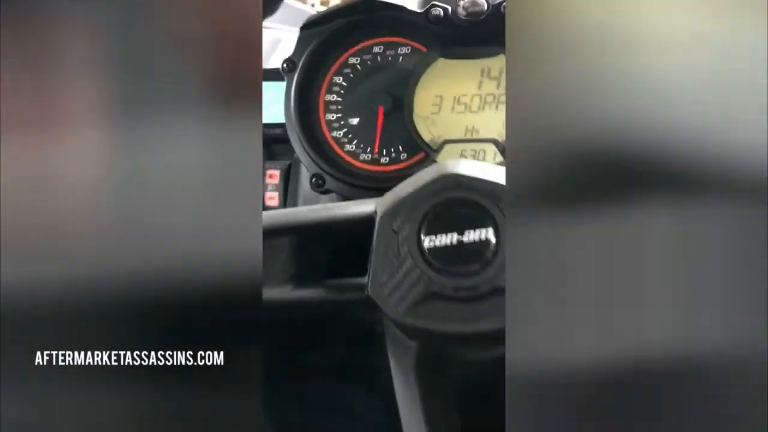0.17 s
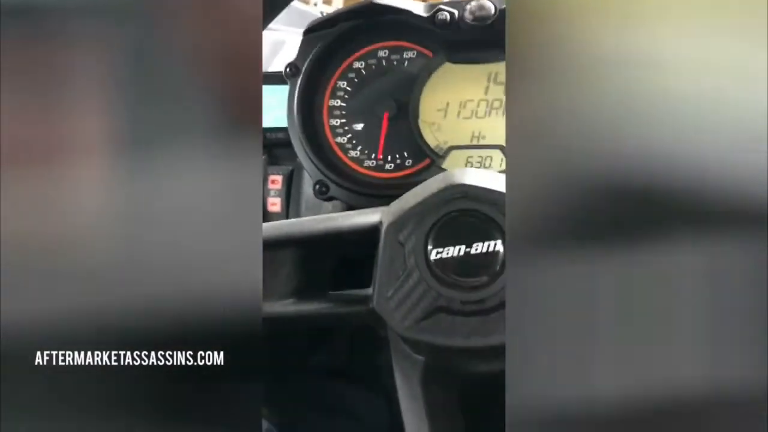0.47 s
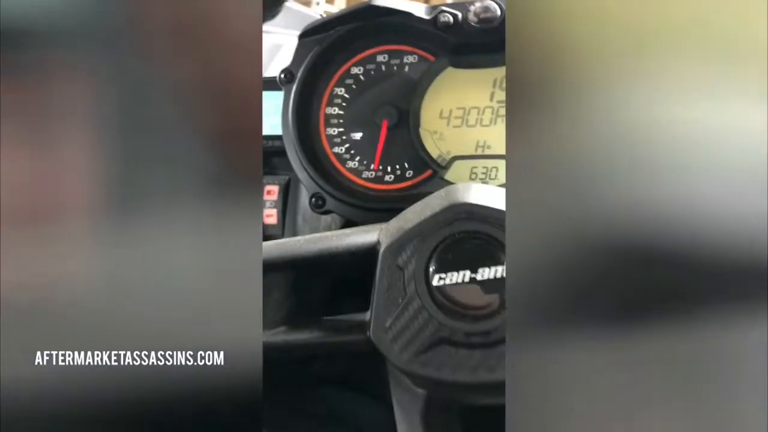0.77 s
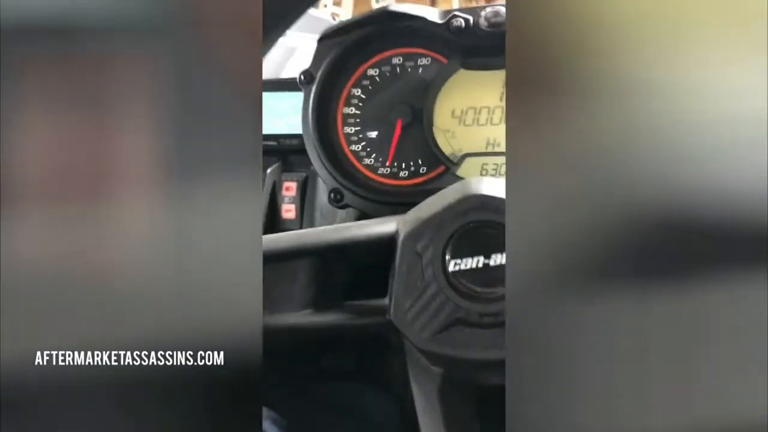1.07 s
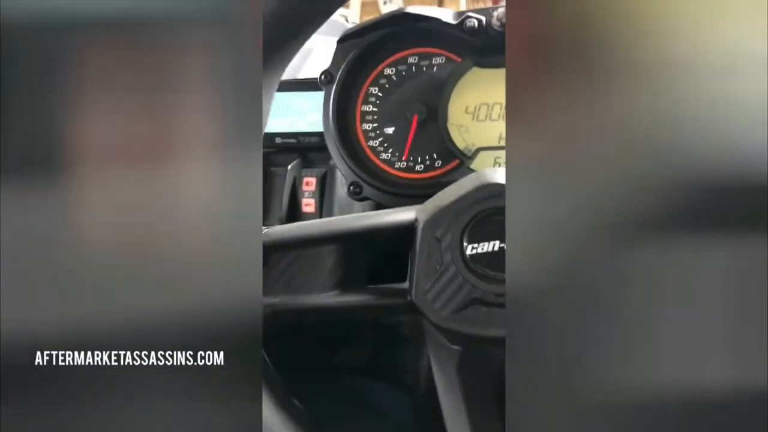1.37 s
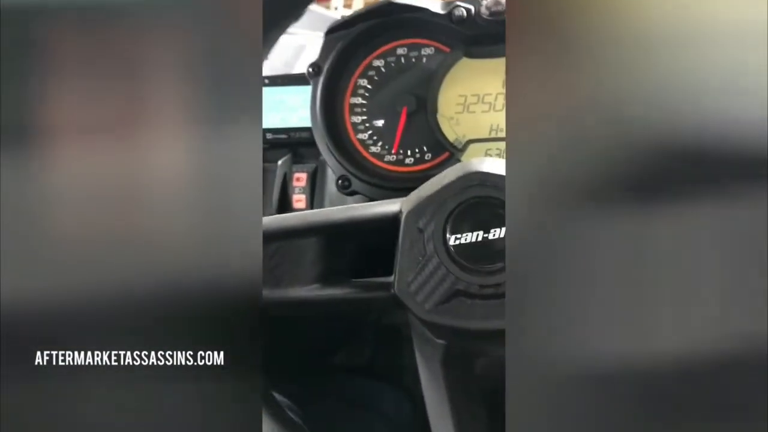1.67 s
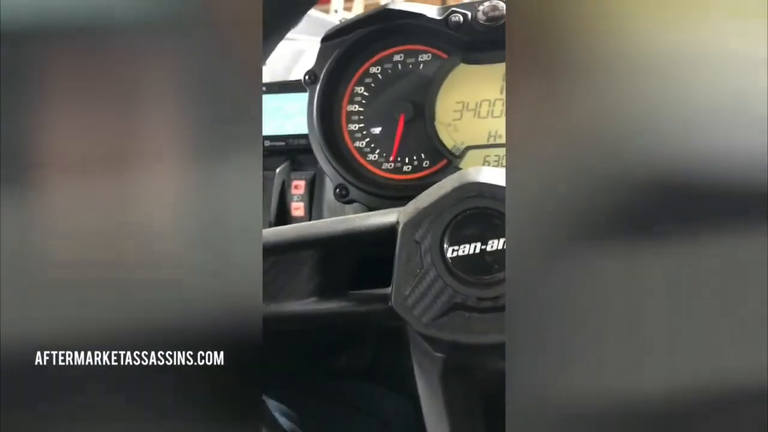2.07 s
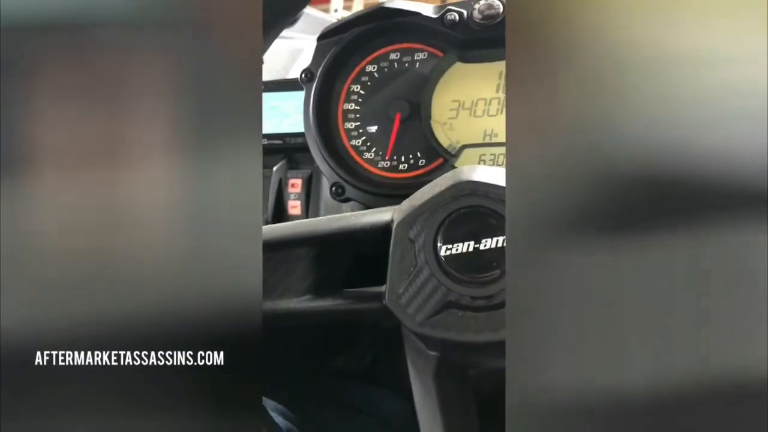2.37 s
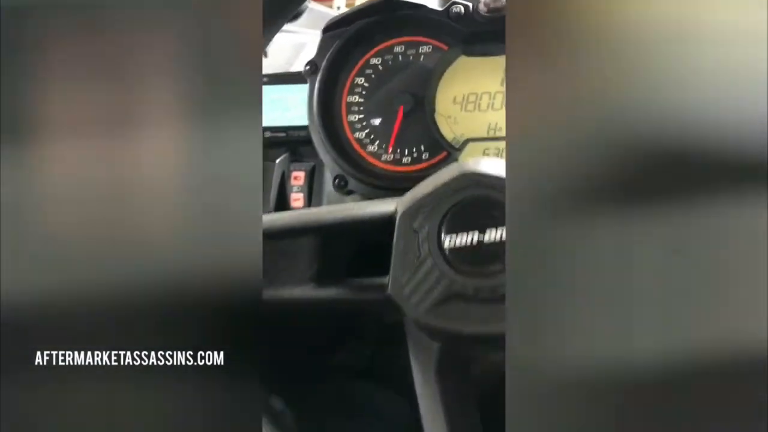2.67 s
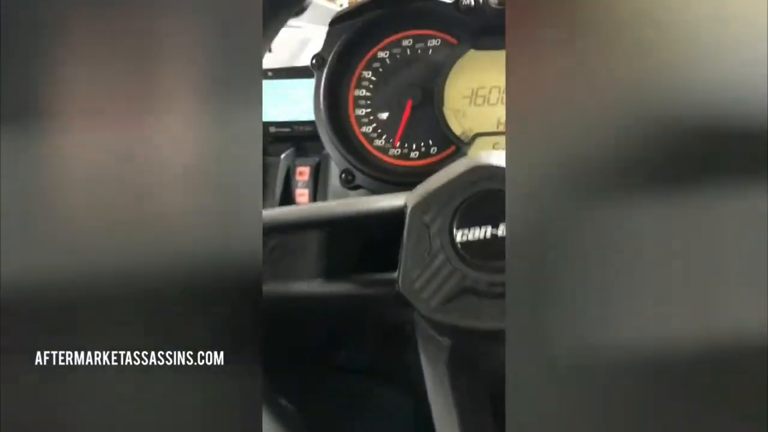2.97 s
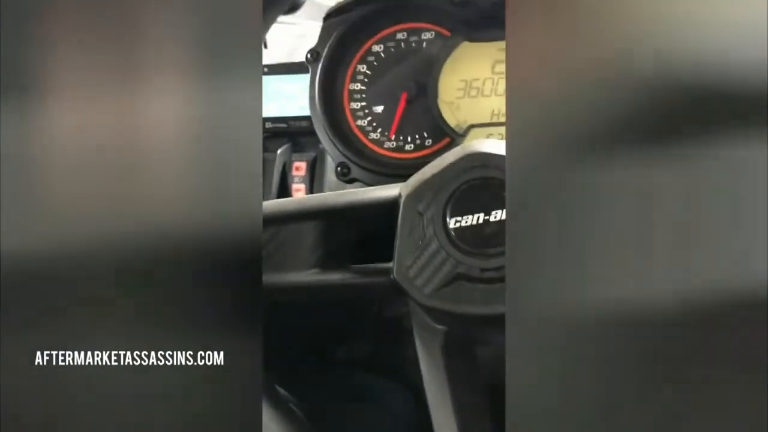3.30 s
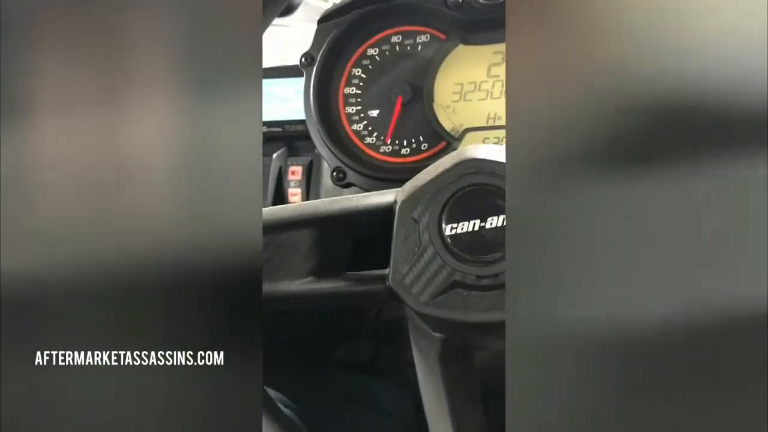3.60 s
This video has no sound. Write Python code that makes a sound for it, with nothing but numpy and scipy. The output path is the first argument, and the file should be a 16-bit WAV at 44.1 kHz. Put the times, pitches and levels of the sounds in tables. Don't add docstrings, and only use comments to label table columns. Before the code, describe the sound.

Three-cylinder engine pulls hard, eases off with a whooshing blow-off hiss, coasts low, then repeats

```python
import sys
import numpy as np
from scipy import signal
from scipy.io import wavfile
from scipy.ndimage import uniform_filter1d

SR = 44100
rng = np.random.default_rng(int(sys.argv[2]) if len(sys.argv) > 2 else 0)


def nominal_scale(level):
    x = np.asarray(level, float) / 20
    return 10 ** x


def unload_audio(sound):
    columns = np.transpose(np.atleast_2d(sound))
    steps = np.round(np.clip(columns, -1, 1) * 32767)
    wavfile.write(sys.argv[1], SR, steps.astype(np.int16))


N = 164934

# (throttle opens [s], lifts [s], stumble ends [s], blow-off level [dB])
REVS = [
    (0., 0.701, .82, -24.5),
    (1.772, 2.495, 2.61, -24.5),
]
THROTTLE_OPEN_S, THROTTLE_SHUT_S = .025, .025


def read(points, hz):
    f, value = np.transpose(points)
    return np.interp(np.log(hz + 1), np.log(f + 1), value)


def evened(x):
    return x / np.sqrt(np.mean(x ** 2) + 1e-20)


def slow(rate_hz):
    span = int(SR / rate_hz)
    return evened(uniform_filter1d(uniform_filter1d(rng.standard_normal(N), span), span))


def gate(t, on, off, rise, fall):
    opening = np.clip((t - on) / rise + .5, 0, 1)
    closing = np.clip((off - t) / fall + .5, 0, 1)
    return opening * closing


def shaped(points, hz):
    gain = nominal_scale(read(points, hz)) * (hz > points[0][0] * .9)
    return gain / np.sqrt((gain ** 2).sum())


def bumps(rows, hz):
    return nominal_scale(sum(db / (1 + (2 * (hz - f) / width) ** 2) for f, width, db in rows))


def noise(field, patchy_db):
    hz = np.fft.rfftfreq(1024, 1 / SR)[:, None]
    t = np.arange(N // 256 + 5) * 256 / SR
    real, imaginary, patches = rng.standard_normal((len(t), 513, 3)).T
    patches = uniform_filter1d(uniform_filter1d(patches, 10, axis=0), 8, axis=1)
    z = (real + 1j * imaginary) * field(hz, t) * nominal_scale(patchy_db * evened(patches))
    return signal.istft(z, nperseg=1024, noverlap=768)[1][:N]


def whistle(hz, width_hz):
    r = np.exp(-np.pi * width_hz / SR)
    a, b = rng.standard_normal((2, N))
    fuzz = signal.lfilter([1], np.convolve([1, -r], [1, -r]), a + 1j * b)
    phase = 2 * np.pi * np.cumsum(hz * np.ones(N)) / SR
    return evened((fuzz * np.exp(1j * phase)).real)


def control(t, column):
    # (time [s], firing rate [Hz], cylinder imbalance [dB], drone swell [dB])
    course = [(0, 76, -22, 0), (.12, 82.7, -31, 0), (.2, 91.4, -22, 0), (.3, 95.5, -28, 0),
              (.51, 113.9, -11, 40), (.69, 124.2, -28, 4.5), (.83, 105.2, -17, 7.5), (1.13, 88.8, -26, 0),
              (1.5, 82.93, -23, -1.5), (1.8, 79, -7, -2), (2.0, 87.34, -27, 0), (2.23, 107.7, -14, 0),
              (2.4, 119.8, -14, 0), (2.49, 124, -18, 5), (2.62, 106.9, -20, 11.5), (2.87, 92.34, -35, 1.5),
              (3.2, 86.25, -16, -0.5), (3.74, 81.3, -20, -1)]
    return np.interp(t, np.array(course)[:, 0], np.array(course)[:, column])


def rumble():
    # (frequency [Hz], density [dB per Hz])
    body = [(20, -27), (40, -25), (70, 25), (120, -13.5), (230, 6), (300, -7.5), (430, -9), (520, -45)]

    def field(hz, t):
        return nominal_scale(read(body, hz) - 40 * (hz > 560)) + 0 * t
    return nominal_scale(-30.5) * evened(noise(field, patchy_db=1.5))


def road_power(hz, t):
    # (frequency [Hz], density [dB per Hz])
    hiss = [(450, -12.5), (600, -2.5), (950, -3.5), (1400, -3), (2500, -7.5), (4400, -8.5), (7500, -20.5),
            (15700, -32)]
    level_db = -29 - 4.5 * np.exp(-t / 0.61)
    return (nominal_scale(level_db) * shaped(hiss, hz)) ** 2


def intake_power(hz, t, on, lift):
    # (frequency [Hz], density [dB per Hz])
    roar = [(450, 0), (700, 1), (1400, -3), (2300, -3.5), (3200, -8.5), (5000, -12.5), (9000, -17),
            (15700, -26)]
    # (frequency [Hz], width [Hz], gain [dB])
    pipes = [(2053, 105, 3), (2470, 360, -1), (2640, 410, 5), (1300, 640, 1)]
    rise_s, fade_s, db_per_hz = 0.15, 0.092, 0.2
    pull = np.clip((t - on) / rise_s, 0, 1) * np.exp(-np.clip(t - lift, 0, 9) / fade_s)
    level_db = -25.5 + db_per_hz * (control(t, column=1) - 118.5)
    return (pull * nominal_scale(level_db) * shaped(roar, hz) * bumps(pipes, hz)) ** 2


def gush_power(hz, t, lift, gush_db):
    # (frequency [Hz], density [dB per Hz])
    jet = [(450, -28), (1000, 0), (2000, -4.5), (3500, -7), (4600, -6.5), (7000, -9.5), (11000, -9.5),
           (15700, -22)]
    # (frequency [Hz], width [Hz], gain [dB])
    pipes = [(3150, 400, 2), (3900, 500, 3), (4620, 200, 5), (7300, 250, 4), (12800, 900, 3),
             (15200, 700, 4)]
    # (frequency [Hz], hold [s])
    hold = [(1000, 0.044), (4000, 0.12), (8000, 0.042), (14000, .02)]
    lead_s, rise_s = .028, .065
    since = t - lift + lead_s
    t60 = read([(1000, 1.86), (12000, 1.47)], hz)
    falling = np.clip(since - rise_s - read(hold, hz), 0, 9)
    swell = np.clip(since / rise_s, 0, 1) * nominal_scale(gush_db - 60 * falling / t60)
    return (swell * shaped(jet, hz) * bumps(pipes, hz)) ** 2


def air():
    # (frequency [Hz], width [Hz], gain [dB])
    cabin = [(617, 46, 4.7), (694, 10, 2.3), (916, 42, 5.2), (1178.4, 17.4, 10.7), (1285, 17, 5.6),
             (1510, 34, 2.1), (2041, 105, 4.6), (2582, 13, 2.3), (2970, 21, 4.7), (3650, 35, 7.2),
             (4690, 66, 8.1), (6600, 160, 3.3), (7130, 200, 3.5)]
    # (frequency [Hz], width [Hz], gain [dB])
    dips = [(1700, 160, -4.5), (4780, 640, -5.5), (7860, 690, -1.5), (10400, 1000, -3.5)]

    def field(hz, t):
        power = road_power(hz, t)
        for on, lift, end, gush_db in REVS:
            power = power + intake_power(hz, t, on, lift) + gush_power(hz, t, lift, gush_db)
        return np.sqrt(power) * bumps(cabin + dips, hz)
    return noise(field, patchy_db=1.28)


def turbo():
    # (frequency [Hz], width [Hz], time after lift [s], length [s], level [dB])
    chirps = [
        (6200, 630, -0.0074, .05, -35.5),
        (4740, 67, 0.078, 0.18, -44),
        (7570, 480, 0.033, 0.1, -49.5),
    ]
    lead_s, start_hz, peak_hz = .36, 9500, 19000
    rise_hz_s, fall_hz_s = 28000, 20000
    t, out = np.arange(N) / SR, np.zeros(N)
    for on, lift, end, gush_db in REVS:
        spool_up = start_hz + rise_hz_s * (t - lift + lead_s)
        spool_down = peak_hz - fall_hz_s * (t - lift)
        hz = np.clip(np.minimum(spool_up, spool_down), 500, 21000)
        whine_db = -50.5 - 5 * (t > lift) + slow(20)
        audible = np.clip((hz - 8000) / 6000, 0, 1)
        out += nominal_scale(whine_db) * audible * whistle(hz, width_hz=1000)
        pull = np.clip((t - on) / (lift - on), 0, 1) * gate(t, on, lift + .04, THROTTLE_OPEN_S, .06)
        out += nominal_scale(-38) * pull * whistle(2045, width_hz=100)
        for f, width, after, length, level_db in chirps:
            puff = np.exp(-(2 * (t - lift - after) / length) ** 2)
            out += nominal_scale(level_db) * puff * whistle(f, width)
    return out


def loaded_pipe_db(f):
    # (frequency [Hz], level [dB])
    response = [(45, -33), (84, -29), (91, -16.5), (101, -18.5), (108, -21.5), (114, -10.5), (121, -27.5),
                (126, -6.5),
                (150, -26), (167, -13), (184, -25), (203, -27), (216, -13.5), (226, -15.5), (236, -8.5),
             (250, -18),
                (273, -19.5), (288, -17), (310, -32), (340, -11), (355, -17.5), (368, -13), (388, -19.5),
            (408, -11),
                (440, -30.5), (455, -21.5), (490, -33.5), (700, -13.5)]
    return read(response, f)


def coasting_pipe_db(f):
    # (frequency [Hz], level [dB])
    drone = [(45, -29), (79, -8.5), (82, -16.5), (86, -15.5), (92, -12.5), (97, -16.5), (101, -20),
             (108, -24),
             (140, -27.5), (170, -36), (200, -43), (260, -49.5), (350, -42), (420, -46.5), (500, -56)]
    return read(drone, f)


def popping_pipe_db(f):
    # (frequency [Hz], level [dB])
    pop = [(40, -44), (73, -17), (108, -20), (147, -18.5), (190, -36.5), (245, -20.5), (300, -37.5),
           (365, -28.5), (520, -57)]
    return read(pop, f)


def engine():
    order_db = [5, -1.5, -7.5, -14, -18, -22]
    catch_s = .012
    boom_peak_hz, boom_turn_hz = 113, 5
    t, out = np.arange(N) / SR, np.zeros(N)
    load, stumble, sag = np.zeros((3, N))
    for on, lift, end, gush_db in REVS:
        opened = on if on > .5 else -1
        load += gate(t, opened, lift, THROTTLE_OPEN_S, THROTTLE_SHUT_S)
        stumble += gate(t, lift, end, THROTTLE_SHUT_S, catch_s)
        recovery = np.clip((end - t) / (end - lift), 0, 1)
        sag += gate(t, lift, end, 2 * THROTTLE_SHUT_S, THROTTLE_OPEN_S) * recovery
    coast = np.clip(1 - load - stumble, 0, 1)

    hz = control(t, column=1) * (1 + .007 * slow(30) - .06 * sag)
    cycle = 2 * np.pi * np.cumsum(hz) / SR / 3
    for k in range(1, 19):
        f = hz * k / 3
        whole = k % 3 == 0
        if whole:
            share_db = 1.1 * slow(8.8)
        else:
            share_db = 2.2 * slow(8.8) + control(t, column=2)
        loaded = nominal_scale(loaded_pipe_db(f) + order_db[(k - 1) // 3])
        coasting = nominal_scale(coasting_pipe_db(f) + control(t, column=3))
        pops = nominal_scale(popping_pipe_db(f) + 2.2 * slow(27))
        if whole:
            phase = .5 * np.arctan((boom_peak_hz - f) / boom_turn_hz)
        else:
            phase = 2 * np.pi * rng.random()
        turn = np.exp(1j * (k * cycle + phase))
        steady = nominal_scale(share_db) * (coasting * coast - loaded * load)
        out += np.sqrt(2) * ((steady + stumble * pops) * turn).real
    return out


def scene():
    return (rumble() + air() + turbo() + engine())[None]


def top_cut(x):
    return signal.sosfilt(signal.butter(12, 15840, fs=SR, output="sos"), x)


def record(dry):
    bass_cut = signal.butter(3, 42, "high", fs=SR, output="sos")
    band_limit = signal.firwin(1023, 15730, window=("kaiser", 9), fs=SR)
    mix = signal.sosfilt(bass_cut, dry)
    mix = signal.oaconvolve(mix, band_limit[None], "same")
    mix = np.clip(mix, -.99, .99)
    return top_cut(mix)


dry = scene()
out = record(dry)
unload_audio(out)
```